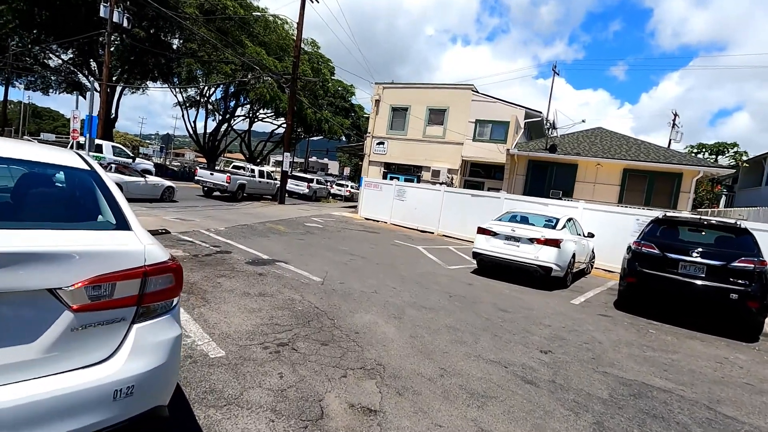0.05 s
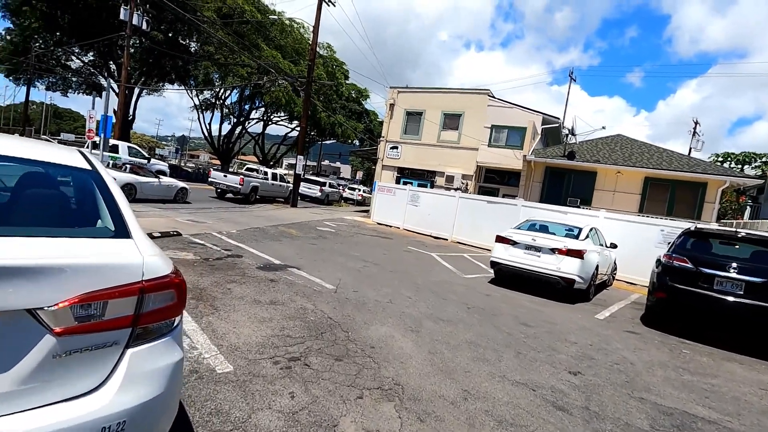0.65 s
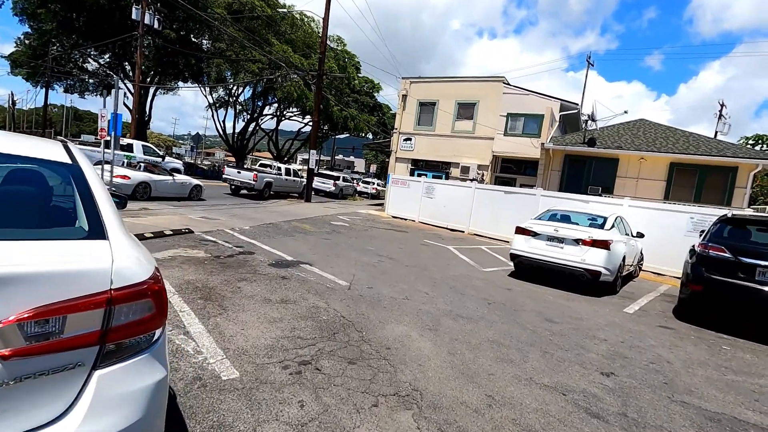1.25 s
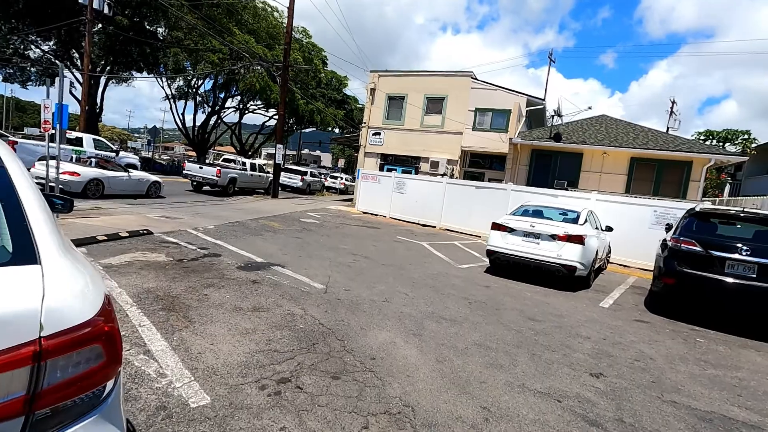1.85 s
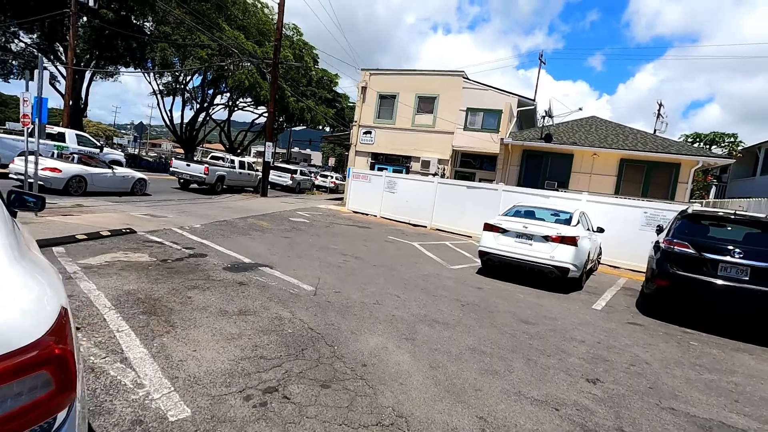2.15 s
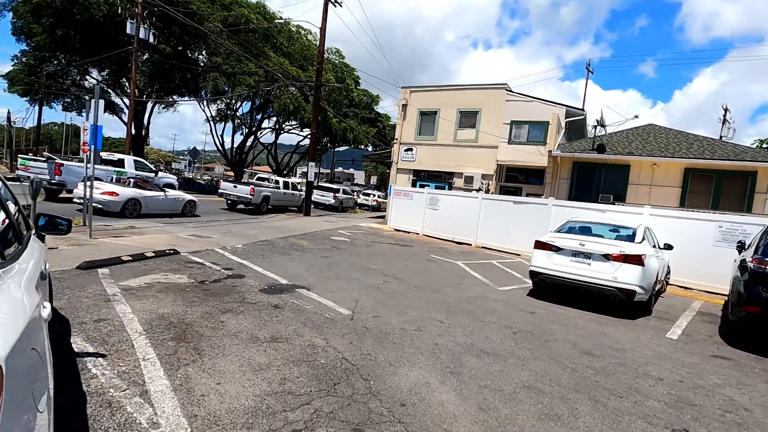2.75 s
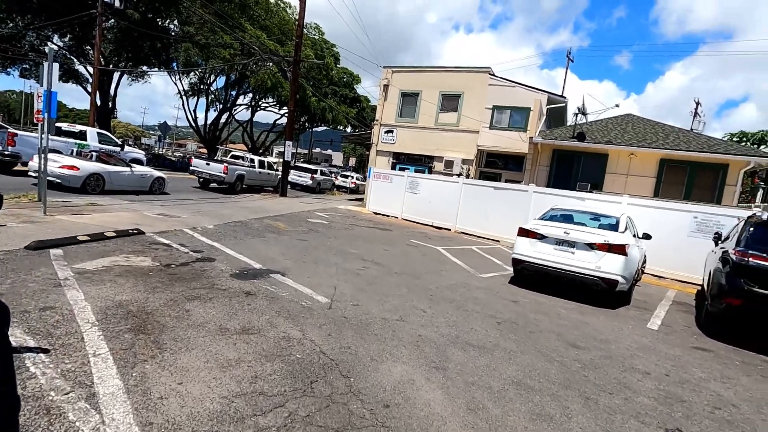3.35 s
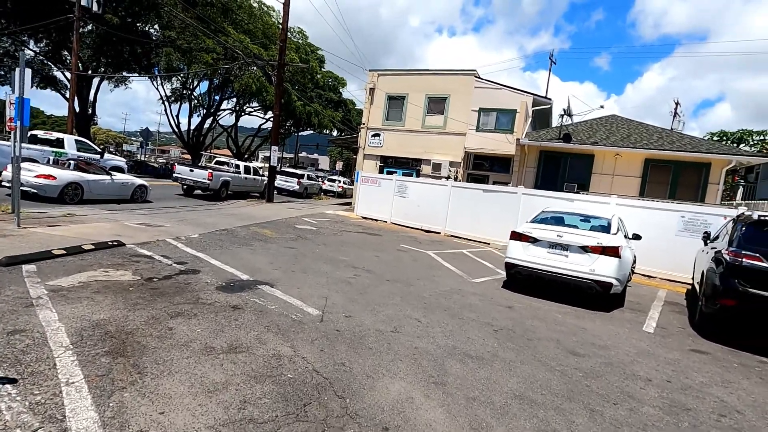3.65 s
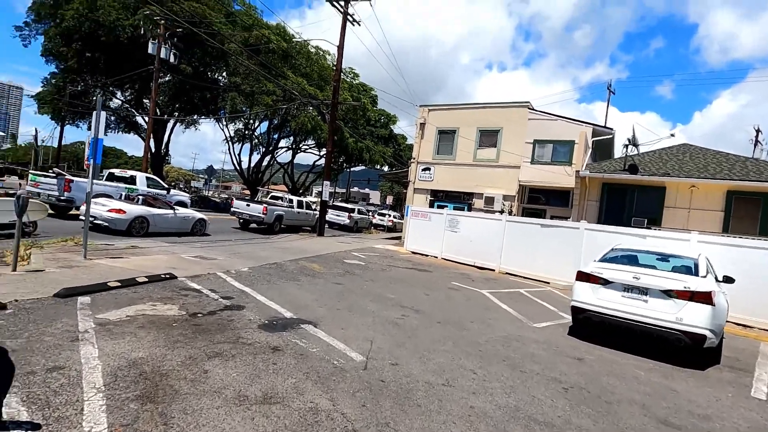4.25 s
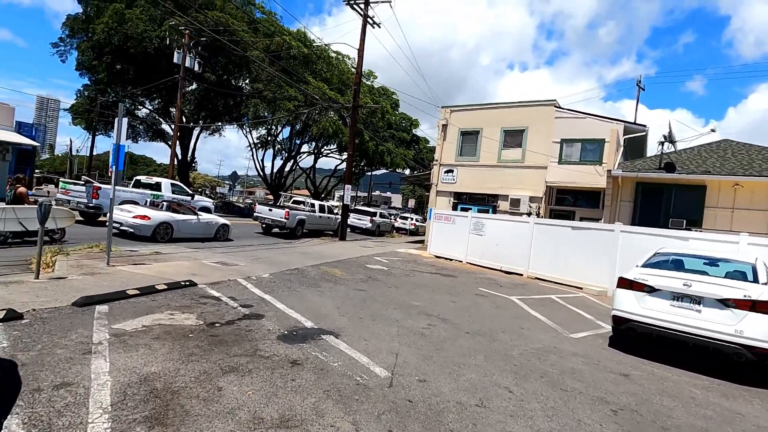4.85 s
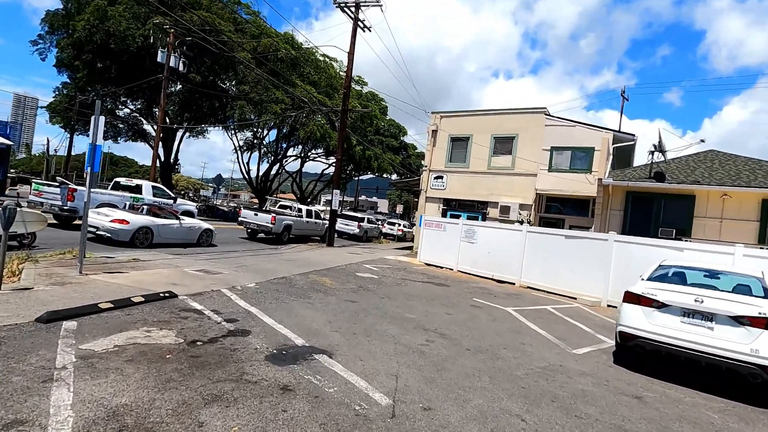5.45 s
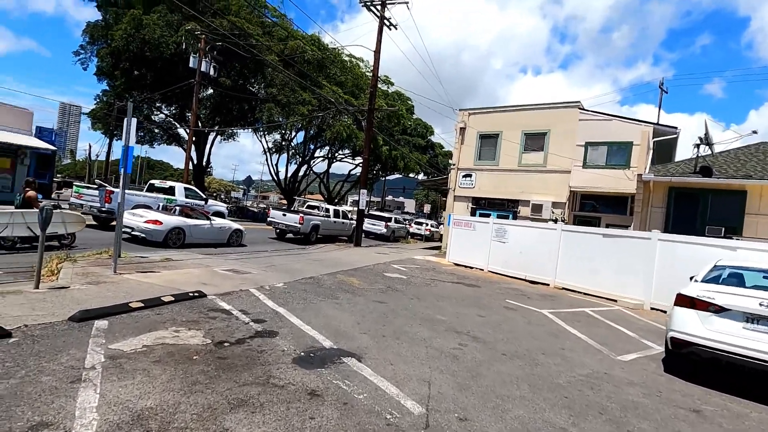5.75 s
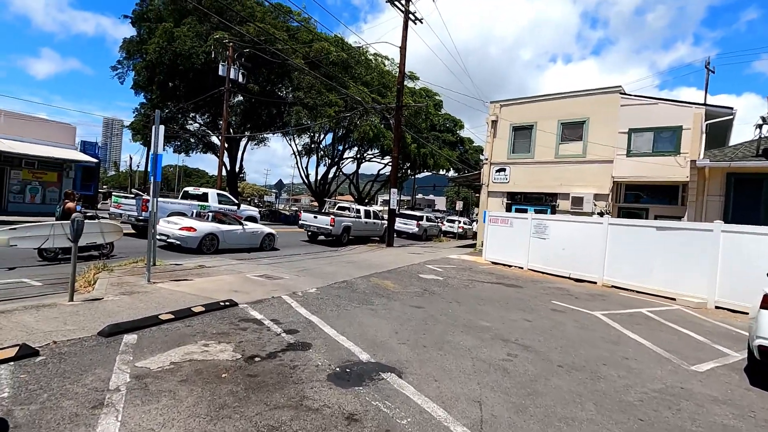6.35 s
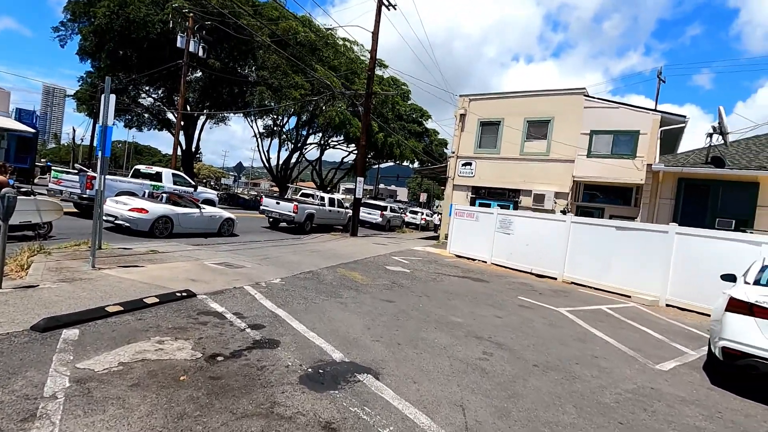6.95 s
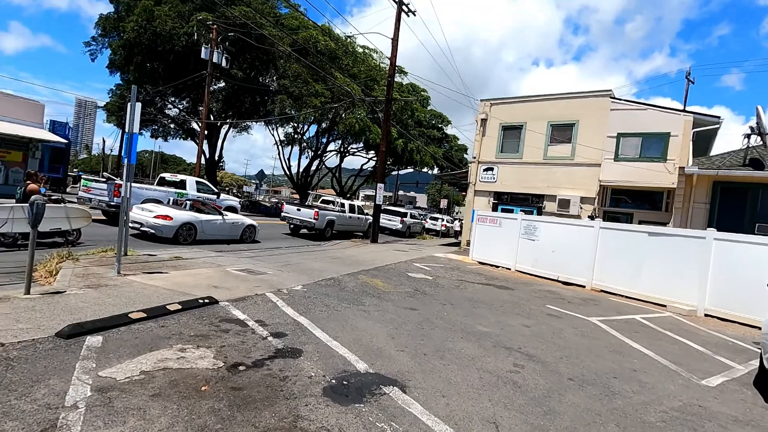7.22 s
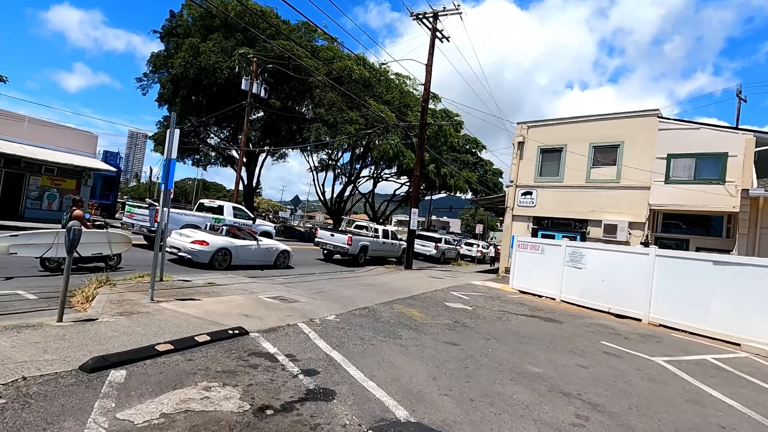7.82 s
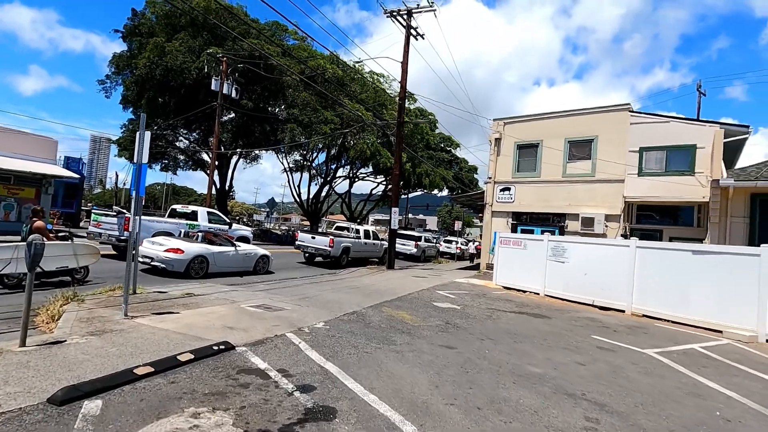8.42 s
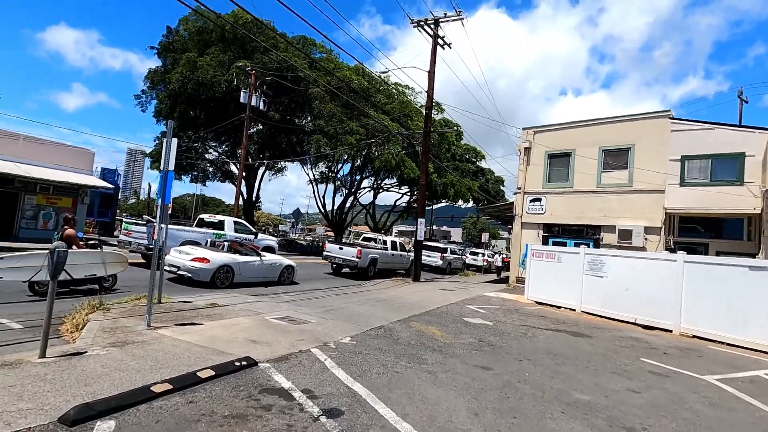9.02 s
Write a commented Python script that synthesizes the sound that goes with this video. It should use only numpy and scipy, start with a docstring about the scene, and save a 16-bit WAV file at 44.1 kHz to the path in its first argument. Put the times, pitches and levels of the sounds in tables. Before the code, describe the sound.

Heard on a slow walk across a parking lot towards the street, queuing cars rumble and idling engines throb throughout. Tyres swell and fade as vehicles creep past, and a brake hisses briefly early on. Wind bumps the microphone now and then, and grit snaps faintly underfoot. In the second half a shoe scuffs once on asphalt, while light valve ticking and very faint pulley chirps come through the traffic.

```python
"""Parking lot by slow traffic

A slow walk towards a street where cars creep along. Two engines throb at idle over the rumble of
the queue, and a third comes near with ticking valves. Motors hum in and out, tyres wash past and
a brake rubs and lets go. Close by, grit snaps underfoot, a few puffs of wind touch the microphone,
a dry pulley chirps faintly and a shoe scuffs once on the asphalt."""
import sys
import numpy as np
from scipy import signal
from scipy.fft import rfft, irfft, next_fast_len
from scipy.io import wavfile
from scipy.ndimage import uniform_filter1d

SR = 44100
rng = np.random.default_rng(int(sys.argv[2]) if len(sys.argv) > 2 else 0)


def transcribe(signal):
    """Save signal, clipped to [-1, 1], as a 16-bit WAV file at the path in sys.argv[1]."""
    frames = np.atleast_2d(signal).T
    limited = np.clip(frames, -1, 1)
    pcm = np.round(limited * 32767).astype(np.int16)
    wavfile.write(sys.argv[1], SR, pcm)


N = 404838

# the booming idle: time_s, firing_rate_hz, level_db
BOOMING_IDLE = [(0, 73.03, -32.5), (0.65, 73.13, -26), (2.0, 73.65, -25.5), (2.75, 73.96, -27.5),
                (3.2, 74.03, -27), (4.6, 73.48, -27), (5.2, 73.37, -35.5), (5.95, 72.05, -31.5),
                (7.0, 73.24, -23.5), (8.05, 74.4, -23.5), (8.45, 73.43, -25.5), (9.18, 73.05, -24.5)]
# its tones: firing_multiple, gain_db
BOOMING_ORDERS = [(.5, -5), (1, 1.5), (1.5, -15), (2, -16)]
# the lumpy idle: time_s, crank_rate_hz, level_db
LUMPY_IDLE = [(0, 18.3, -35), (3, 21, -37.5), (5.8, 20.4, -34), (7.5, 20.95, -36), (9.18, 21.1, -34.5)]
# its tones: crank_multiple, gain_db
LUMPY_IDLE_ORDERS = [(1, -12), (2, -0.5), (3, 0.5), (4, -2), (5, -6.5), (6, -9)]
# the ticking engine coming near: time_s, level_db
VALVE_LEVELS = [(0, -74.5), (4.5, -65.5), (6, -59), (7.5, -57), (8.15, -56.5), (8.7, -60), (9.18, -57)]
# the ring of its engine bay: pitch_hz, width_hz, gain_db
BAY_RESONANCES = [(1400, 63, 0), (1665, 60, 6), (2256, 70, -4), (2663, 57, 0.5), (4880, 280, -4),
                  (5760, 360, -1), (8100, 400, -15.5), (9500, 500, -17.5), (12400, 700, -20)]
# machines running further off: pitch_hz, level_db, peak_s, half_length_s
MACHINE_TONES = [(27.5, -31.5, 1.5, 4.7), (60.5, -42.5, 8.5, 2), (90.25, -35, 4.8, 6.4),
                 (96.8, -41, 3.2, 15), (133.2, -43, 7.0, 1.2), (170.1, -43.5, 6, 3.3), (184, -45, 7, 3)]

# colours of the queue's rumble and drone, the tyres' roar and hiss: frequency_hz, density_db
RUMBLE_COLOUR = [(14, -16.5), (22, -7.5), (31, 6.5), (40, -4.5), (50, 1), (62, -1), (76, -4.5), (90, -5),
                 (112, -4), (160, -27.5)]
DRONE_COLOUR = [(80, -21), (105, -2.5), (135, -1), (170, -3), (200, -3.5), (240, -7), (290, -10),
                (380, -14.5), (520, -27), (900, -29)]
ROAR_COLOUR = [(280, -12), (420, 0), (600, 0.5), (750, 0.5), (880, -3.5), (1080, -1.5), (1350, -8),
               (1650, -9), (1950, -12.5), (2500, -15.5), (3500, -23), (5000, -28.5), (9000, -47)]
HISS_COLOUR = [(1500, -14), (2600, 6.5), (3800, 4.5), (4700, -1.5), (5800, -1), (7100, -8.5), (8200, -8),
               (9600, -12), (11300, -23.5), (12500, -23.5), (14000, -33.5), (15700, -31)]
# cars pulling forward in the queue: peak_s, half_length_s, boost_db
QUEUE_SURGES = [(0.798, 0.19, 4), (1.79, 0.19, 2), (5.6, 0.41, 2.5), (8.601, 0.31, 6.5)]
# narrow humps on top of the tyre roar: centre_hz, width_hz, gain_db
ROAR_HUMPS = [(468, 4.9, -22.5), (563.3, 17, -11.5), (908, 11, -17), (1166, 35, -20), (1632, 54, -22),
              (2220, 43, -26)]
# cars going past: nearest_s, approach_s, roar_db, hiss_db, tread_pitch_hz
PASS_BYS = [(0, 0.69, -43.5, -57.5, 1013), (3.05, 0.26, -43.5, -68.5, 586.2), (4.05, .18, -47.5, -70, 1047),
            (5.25, .5, -40, -61, 728.8), (9.15, .8, -51, -71.5, 800)]
# reflections off asphalt and parked cars: delay_s, gain_db
ECHOES = [(.0021, -27), (.0047, -33), (.0083, -19.5), (0.0133, -16)]
# motors creeping by: peak_s, length_s, pitch_hz, level_db, glide_hz_per_s, width_ratio
MOTOR_HUMS = [(.8, 2.3, 483, -48.5, 1, 0.023), (.9, 2.5, 991, -53, -8.5, .04),
              (2.65, 1.6, 233.6, -41.5, 0, 0.039), (2.8, 0.43, 92, -26.5, 0.5, .03),
              (3.402, 1.5, 578.4, -49.5, 0, .1), (3.7, 1.1, 354, -49, 0, .12),
              (6.85, 0.93, 410, -48, -0.5, .12), (7.1, 1.37, 239, -44, 0.5, 0.021),
              (5.4, 2.1, 731.6, -48.5, -35.5, .17), (5.948, 1.16, 242, -44, -2, 0.039),
              (6.001, 3.16, 1630, -57, 0, .025), (6.3, 2.5, 2305, -60.5, 0.5, .02),
              (6.098, 3, 311.8, -47, 9, 0.044), (6.283, 0.31, 165.2, -39, 0, .03),
              (6.499, 1.4, 601, -48.5, -15, 0.064), (8.147, 0.54, 249, -37.5, -35, .02),
              (7.998, 5.2, 902, -53, -7.5, .014), (8.705, 2.4, 394, -50, -1.5, .05),
              (9.048, 0.73, 237.3, -41.5, -0.5, 0.023)]

# colour of the rubbing brake: frequency_hz, density_db
BRAKE_COLOUR = [(1700, 2), (2200, 3.5), (3000, -2), (3800, -1), (5200, -7), (6500, -17), (12500, -27.5),
                (15000, -28)]
# its glints of squeal: peak_s, half_length_s, level_db
BRAKE_GLINTS = [(.46, .12, -85), (.64, .05, -77)]
# the ring of its disc: pitch_hz, gain_db
DISC_TONES = [(7700, 4), (11453, -1), (12570, -6)]

# grains snapping underfoot, and the sole catching as it skids: start_s, level_db, decay_s, pitch_hz
GRIT_SNAPS = [(.022, -51, .012, 5000), (.222, -57, .005, 5000), (4.468, -46.5, .004, 7000),
              (8.08, -54.5, .035, 4500)]
SOLE_CATCHES = [(5.727, -42, .01, 2500), (5.7371, -26, .0038, 2900), (5.7424, -28.5, .002, 3300),
                (5.7466, -30.5, .0022, 3100), (5.751, -41, .008, 2200), (5.7608, -34.5, .0022, 3800),
                (5.7645, -31, .0024, 2300), (5.7765, -29.5, .0042, 4700), (5.781, -37, .004, 3000)]
# colour of the scuff: frequency_hz, density_db
GRIT_COLOUR = [(700, 13), (1600, 2), (2300, 5.5), (3000, 6.5), (3700, -1), (4600, -5), (5600, -7.5),
               (7700, -12), (10000, -18), (15000, -27)]
# wind on the microphone: peak_s, half_length_s, level_db
WIND_PUFFS = [(1.0, 0.19, -27.5), (2.35, 0.043, -21), (4.297, 0.13, -27), (4.636, 0.19, -23),
              (5.38, .15, -24.5)]
# its colour: frequency_hz, density_db
WIND_COLOUR = [(20, -8), (40, 1.5), (58, 0.5), (72, -9), (100, -8.5), (180, -19.5)]
# turns on which the dry pulley chirps: peak_s, level_db
PULLEY_CHIRPS = [(3.952, -60), (4.075, -64), (4.136, -59), (4.197, -59), (4.315, -67), (4.736, -60),
                 (4.795, -61), (5.925, -62), (6.044, -65), (6.280, -62), (6.578, -65), (6.691, -61),
                 (6.929, -59), (6.965, -63), (7.169, -63), (7.289, -63), (7.346, -66), (7.463, -62),
                 (7.587, -65), (7.645, -66), (7.768, -65), (7.828, -65), (7.890, -59), (7.951, -61),
                 (8.011, -59), (8.070, -60), (8.189, -61), (8.248, -58), (8.307, -65), (8.657, -64),
                 (8.718, -65), (8.897, -60), (9.018, -60), (9.135, -59)]

RUMBLE_DB, DRONE_DB, ROAR_DB, HISS_DB = -30.5, -33, -40.5, -62   # the street bed between events


def from_db(db):
    """Decibels to gain."""
    return np.exp(np.asarray(db) * (np.log(10) / 20))


def rms_one(x):
    """Scale to rms 1."""
    return x / np.sqrt(np.mean(x ** 2) + 1e-20)


def since(s):
    """Seconds since a moment, at every sample."""
    return np.arange(N) / SR - s


def bell(s, half_s):
    """A smooth swell of height 1, down to 1/e at half_s either side of its peak."""
    return np.exp(-(since(s) / half_s) ** 2)


def automation(rows):
    """Join timed breakpoints into one curve for each column after the time."""
    times, *columns = np.transpose(rows)
    return [np.interp(since(0), times, column) for column in columns]


def drift(rate_hz):
    """A smooth random wander of rms about 1: noise twice through a one-pole low-pass."""
    hop, settle = 40, 2000
    pole = np.exp(-2 * np.pi * hop * rate_hz / SR)
    noise = rng.standard_normal(N // hop + settle + 2)
    slow = signal.lfilter([1], [1, -2 * pole, pole * pole], noise)[settle:]
    return np.interp(np.arange(N) / hop, np.arange(len(slow)), rms_one(slow))


def narrow_noise(hz, width_hz):
    """Noise in one resonance; rms 1."""
    band = signal.butter(1, [hz - width_hz / 2, hz + width_hz / 2], "band", fs=SR, output="sos")
    return rms_one(signal.sosfilt(band, rng.standard_normal(N)))


def coloured_noise(colour):
    """Noise with the given spectrum, falling away beyond its ends; rms 1."""
    hz, db = np.transpose(colour)
    size = next_fast_len(N)
    bin_hz = np.maximum(np.arange(size // 2 + 1) * SR / size, 1)
    roll_off = np.minimum(1, np.minimum(bin_hz / hz[0], hz[-1] / bin_hz)) ** 4
    gain = from_db(np.interp(np.log(bin_hz), np.log(hz), db)) * roll_off
    return rms_one(irfft(rfft(rng.standard_normal(size)) * gain, size)[:N])


def rough_tone(hz, width_hz):
    """A tone smeared over the given width by wavering level and phase; rms about 1."""
    phase = 2 * np.pi * np.cumsum(hz * np.ones(N)) / SR
    return drift(width_hz / 2) * np.cos(phase) + drift(width_hz / 2) * np.sin(phase)


def low_end_dip():
    """Gain that briefly ducks the rumble and the lumpy idle."""
    return from_db(-5 * bell(5.0, half_s=0.19))


def idling_engine(curve, orders, trim_db, throb_db, uneven):
    """An idle is a stack of throbbing tones locked to the crank; the weak ones waver most."""
    rate_hz, level_db = automation(curve)
    cycles = np.cumsum(rate_hz) / SR
    out = np.zeros(N)
    for order, db in orders:
        throb = from_db(throb_db * drift(19))
        waver = 1 + uneven * (1 - from_db(db)) * drift(0.77)
        tone = np.sqrt(2) * np.sin(2 * np.pi * (order * cycles + rng.random()))
        out += from_db(db) * throb * waver * tone
    return from_db(level_db + trim_db) * out


def valves(rate_hz, trim_db, whirr):
    """One tap per firing rings the engine bay, over an even whirr of belts and chain."""
    age = (since(0) * rate_hz % 1) / rate_hz
    taps = (1 - np.exp(-age / 0.00034)) * np.exp(-age / 0.0047) * from_db(drift(15))
    envelope = rms_one(whirr + taps)
    bay = rms_one(sum(from_db(db) * narrow_noise(hz, width) for hz, width, db in BAY_RESONANCES))
    return from_db(automation(VALVE_LEVELS)[0] + trim_db) * envelope * bay


def far_machines(trim_db, waver_db):
    """Steady low tones fade in and out as the listener walks past their sources."""
    out = np.zeros(N)
    for hz, db, peak_s, half_s in MACHINE_TONES:
        swell = from_db(db + waver_db * drift(0.84)) * bell(peak_s, half_s)
        out += swell * np.sqrt(2) * np.sin(2 * np.pi * (hz * since(0) + rng.random()))
    return from_db(trim_db) * out


def traffic_queue(evenness, drone_follows):
    """Many exhausts merge into a rumble and a drone above it; both swell as a car pulls forward."""
    surge_db = sum(db * bell(peak_s, half_s) for peak_s, half_s, db in QUEUE_SURGES)
    rumble = coloured_noise(RUMBLE_COLOUR)
    envelope = np.sqrt(uniform_filter1d(rumble ** 2, size=SR // 8) + 1e-9)
    rumble = rms_one(rumble / envelope ** evenness)   # running engines hold their level
    drone = from_db(DRONE_DB + drone_follows * surge_db) * coloured_noise(DRONE_COLOUR)
    return from_db(RUMBLE_DB + surge_db) * low_end_dip() * rumble + drone


def pass_by(nearest_s, approach_s, linger=2.12):
    """Gain of a passing car: it swells until it is nearest, then fades more slowly."""
    return bell(nearest_s, approach_s * np.where(since(nearest_s) > 0, linger, 1))


def street_gains():
    """Roar and hiss of the far street and each passing car add in power, as does an engine fan's hiss."""
    fan = from_db(automation(VALVE_LEVELS)[0])   # comes near with the ticking engine
    roar, hiss = from_db(ROAR_DB), np.hypot(from_db(HISS_DB), fan)
    for nearest_s, approach_s, roar_db, hiss_db, _ in PASS_BYS:
        near = pass_by(nearest_s, approach_s)
        roar = np.hypot(roar, from_db(roar_db) * near)
        hiss = np.hypot(hiss, from_db(hiss_db) * near)
    return roar, hiss


def tyre_wash(flutter_db, grain_db, brighten):
    """Tyres roar around a few humps; the hiss above is slightly grainy, and brighter when louder."""
    roar_gain, hiss_gain = street_gains()
    roar = coloured_noise(ROAR_COLOUR)
    roar += sum(from_db(db) * narrow_noise(hz, width) for hz, width, db in ROAR_HUMPS)
    hiss = coloured_noise(HISS_COLOUR) * from_db(flutter_db * drift(25) + grain_db * drift(250))
    air = signal.sosfiltfilt(signal.butter(2, 10500, "high", fs=SR, output="sos"), hiss)
    hiss_db = 20 * np.log10(hiss_gain)
    shelf_db = brighten * np.minimum(hiss_db - hiss_db.mean(), 3)
    hiss += air * (from_db(shelf_db) - 1)
    return roar_gain * roar + hiss_gain * hiss


def with_reflections(sound, delay_wander):
    """Short echoes ripple the spectrum; their delays shift as the listener walks."""
    samples = np.arange(N)
    out = sound.copy()
    for delay_s, db in ECHOES:
        lag = delay_s * SR * (1 + delay_wander * drift(.1))
        out += from_db(db) * np.interp(samples - lag, samples, sound)
    return out


def treads(over_roar_db, width_ratio, doppler_ratio):
    """Each passing car's tread sings a rough note that sinks as it goes by."""
    out = np.zeros(N)
    for nearest_s, approach_s, roar_db, _, hz in PASS_BYS:
        pitch_hz = hz * (1 - doppler_ratio * np.tanh(since(nearest_s) / approach_s))
        swell = from_db(roar_db + over_roar_db) * pass_by(nearest_s, approach_s)
        out += swell * rough_tone(pitch_hz, hz * width_ratio)
    return out


def creeping_cars():
    """Each motor's rough hum swells, glides with its speed and fades."""
    out = np.zeros(N)
    for peak_s, length_s, hz, db, glide, width_ratio in MOTOR_HUMS:
        swell = np.cos(np.pi * np.clip(since(peak_s) / length_s, -.5, .5))
        out += from_db(db) * swell * rough_tone(hz + glide * since(peak_s), hz * width_ratio)
    return out


def brake(release_s, release_db, ease_db_per_s, fade_db_per_s):
    """A pad hisses on its disc with two faint glints of squeal, eases, bites once more and lets go."""
    before, after = np.maximum(-since(release_s), 0), np.maximum(since(release_s), 0)
    bite_db = 4 * bell(.68, half_s=.09)
    hiss_db = release_db + ease_db_per_s * before - fade_db_per_s * after + bite_db
    glints = sum(from_db(db) * bell(peak_s, half_s) for peak_s, half_s, db in BRAKE_GLINTS)
    disc = sum(from_db(db) * rough_tone(hz, width_hz=15) for hz, db in DISC_TONES)
    return from_db(hiss_db) * coloured_noise(BRAKE_COLOUR) + glints * disc


def grit_cracks(hits, noise, rise_s, crack_db, ring_cycles):
    """Each hit is a crack that rings a few cycles and a fast-dying puff of noise around its pitch."""
    out, age = np.zeros(N), np.arange(SR // 4) / SR
    for start_s, db, decay_s, hz in hits:
        start = int(start_s * SR)
        span = slice(start, start + len(age))
        band = signal.butter(1, [hz / 2, min(hz * 2, SR / 2 - 1)], "band", fs=SR, output="sos")
        puff = rms_one(signal.sosfilt(band, noise[span])) * np.exp(-age / decay_s)
        crack = from_db(crack_db) * np.sin(2 * np.pi * hz * age) * np.exp(-age * hz / ring_cycles)
        attack = 1 - np.exp(-age / rise_s)
        out[span] += from_db(db) * attack * (puff + crack)
    return out


def grit_snaps(trim_db):
    """Single grains snap brightly underfoot."""
    fizz = narrow_noise(6500, width_hz=2500)
    return from_db(trim_db) * grit_cracks(GRIT_SNAPS, fizz, rise_s=.00044, crack_db=-3, ring_cycles=3)


def shoe_scuff(drag_s, drag_db, grain_db):
    """A rubber sole skids in a few quick, slightly dulled catches and drags on grit between them."""
    grit = coloured_noise(GRIT_COLOUR)
    catches = grit_cracks(SOLE_CATCHES, grit, rise_s=.0004, crack_db=4, ring_cycles=4)
    thin_grit = coloured_noise(GRIT_COLOUR[1:])
    scrape = rms_one(thin_grit * from_db(grain_db * drift(300)))
    drag = from_db(drag_db) * bell(drag_s, half_s=.024) * scrape
    return signal.sosfilt(signal.butter(1, 12000, fs=SR, output="sos"), catches + drag)


def wind():
    """Short puffs of low noise buffet the microphone."""
    puffs = sum(from_db(db) * bell(peak_s, half_s) for peak_s, half_s, db in WIND_PUFFS)
    return puffs * coloured_noise(WIND_COLOUR)


def pulley(centre_hz, waver_hz, trim_db):
    """A dry pulley chirps in tiny soft-edged swells of one high, wavering tone."""
    swells = sum(from_db(db) * bell(peak_s, half_s=.0042) for peak_s, db in PULLEY_CHIRPS)
    pitch_hz = centre_hz + waver_hz * drift(waver_hz)
    tone = np.sqrt(2) * np.sin(2 * np.pi * np.cumsum(pitch_hz) / SR)
    return from_db(trim_db) * swells * tone


def scene():
    """A mono mix of three stems: running machines, street traffic and the walker's close sounds."""
    machines = idling_engine(BOOMING_IDLE, BOOMING_ORDERS, trim_db=-1, throb_db=0.46, uneven=0.42)
    lumpy = idling_engine(LUMPY_IDLE, LUMPY_IDLE_ORDERS, trim_db=0, throb_db=1, uneven=0.37)
    machines += low_end_dip() * lumpy
    machines += valves(rate_hz=26.4, trim_db=1.5, whirr=.36)
    machines += pulley(centre_hz=9150, waver_hz=225, trim_db=-5)
    machines += far_machines(trim_db=1, waver_db=1)

    traffic = traffic_queue(evenness=0.69, drone_follows=0.26) + creeping_cars()
    traffic += treads(over_roar_db=-6, width_ratio=0.13, doppler_ratio=.04)
    traffic += brake(release_s=0.85, release_db=-58.5, ease_db_per_s=12, fade_db_per_s=50)
    traffic += with_reflections(tyre_wash(flutter_db=1, grain_db=1, brighten=.8), delay_wander=0.023)

    close = shoe_scuff(drag_s=5.764, drag_db=-42, grain_db=3) + grit_snaps(trim_db=-3) + wind()
    return (machines + traffic + close)[None]


def record(dry):
    """A 3 ms fade-in, a gentle cut of the deepest bass and a steep cut of the very top."""
    bass_cut = signal.butter(2, 12, "high", fs=SR, output="sos")
    top_cut = signal.ellip(10, .1, 70, 15700, fs=SR, output="sos")
    fade_in = np.minimum(since(0) / .003, 1)
    return signal.sosfilt(top_cut, signal.sosfilt(bass_cut, dry * fade_in))


dry = scene()
out = record(dry)
transcribe(out)
```